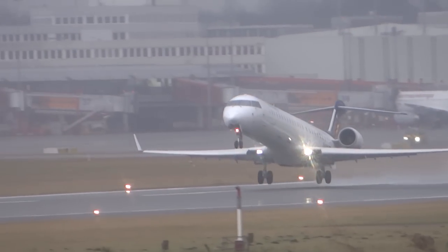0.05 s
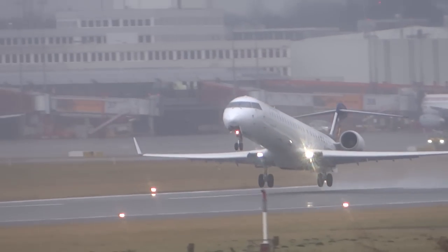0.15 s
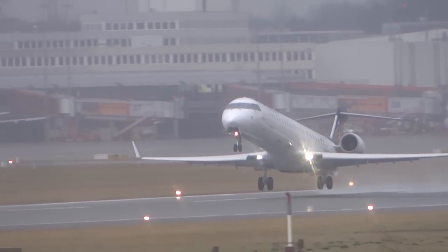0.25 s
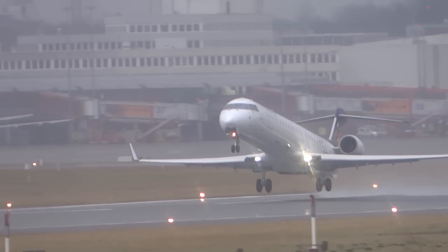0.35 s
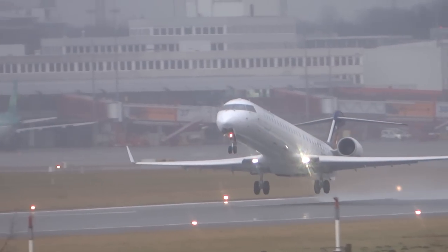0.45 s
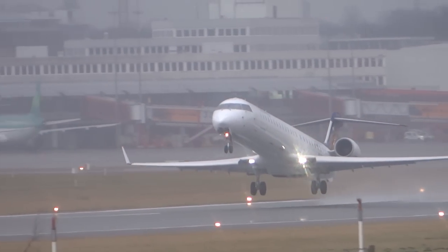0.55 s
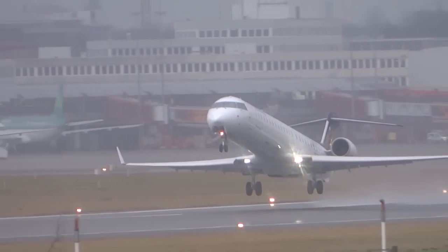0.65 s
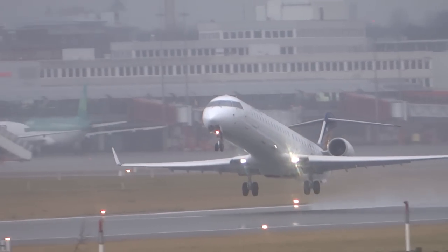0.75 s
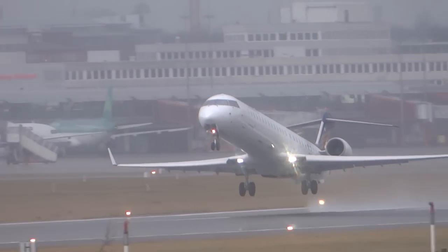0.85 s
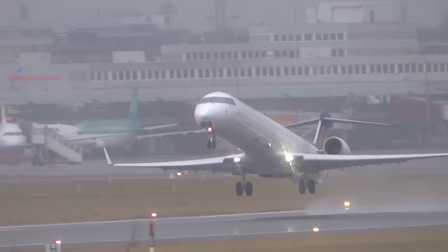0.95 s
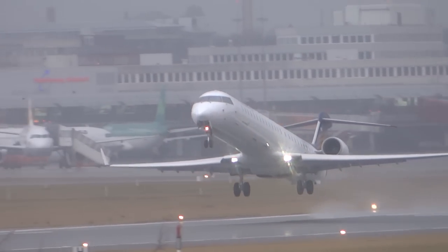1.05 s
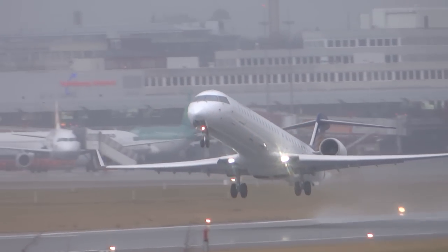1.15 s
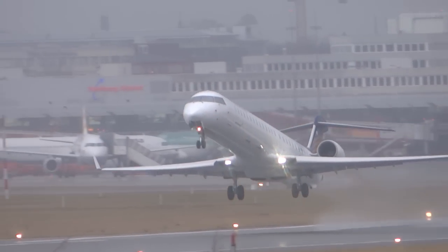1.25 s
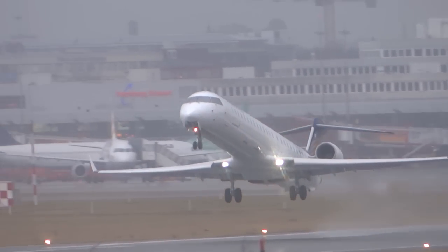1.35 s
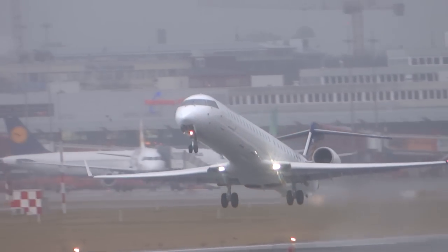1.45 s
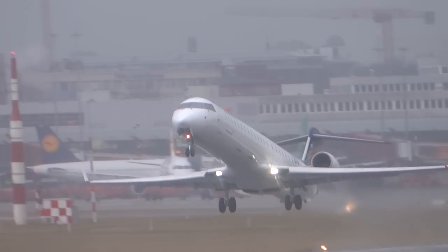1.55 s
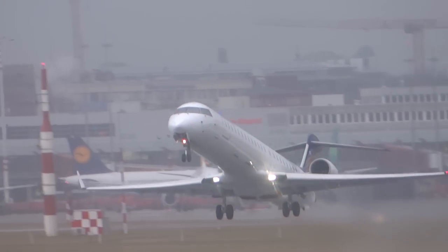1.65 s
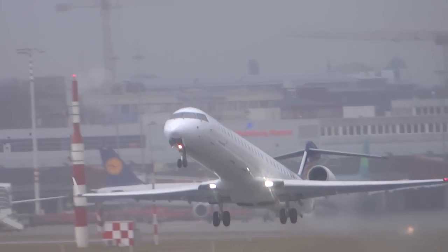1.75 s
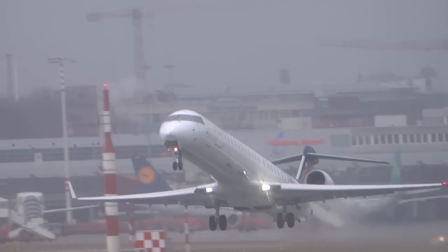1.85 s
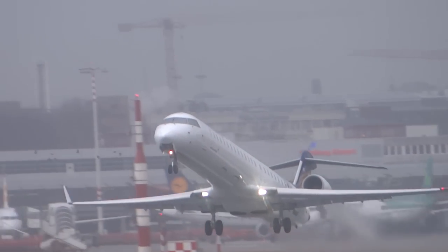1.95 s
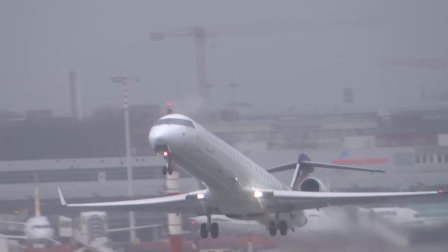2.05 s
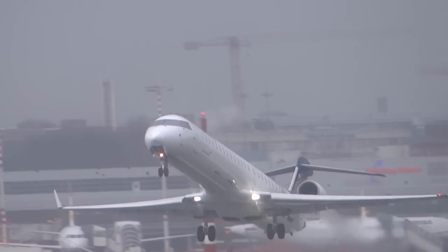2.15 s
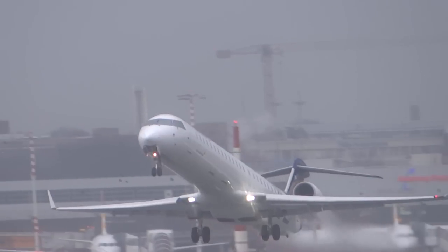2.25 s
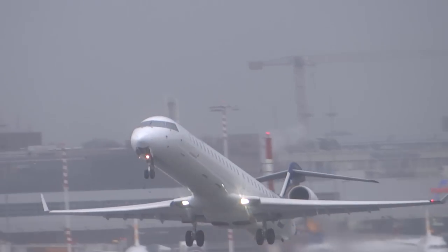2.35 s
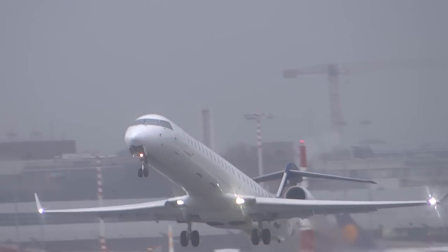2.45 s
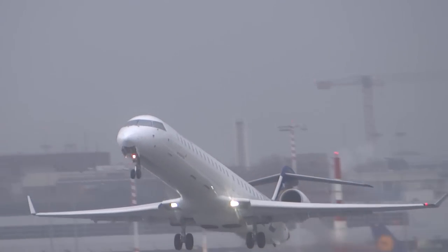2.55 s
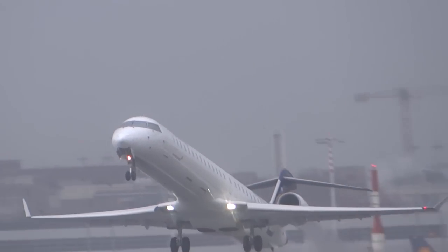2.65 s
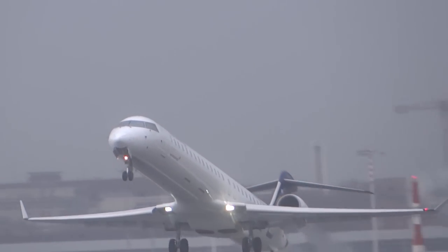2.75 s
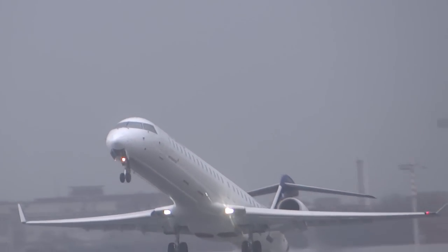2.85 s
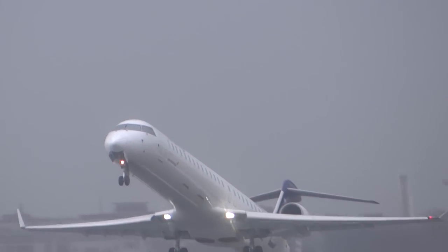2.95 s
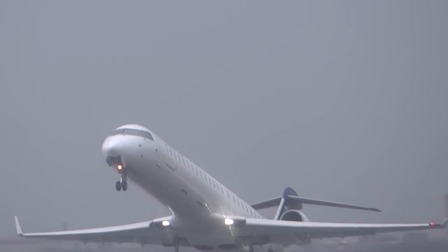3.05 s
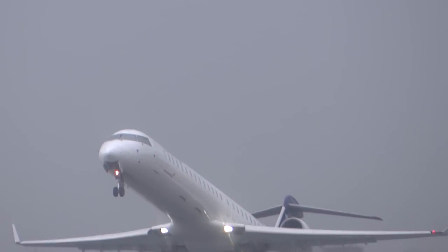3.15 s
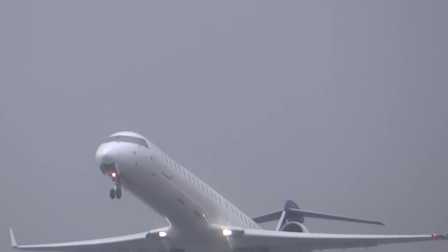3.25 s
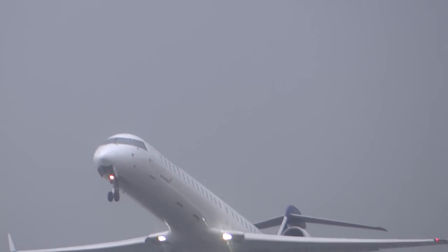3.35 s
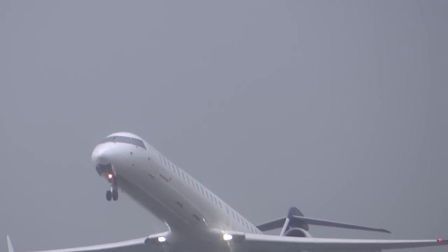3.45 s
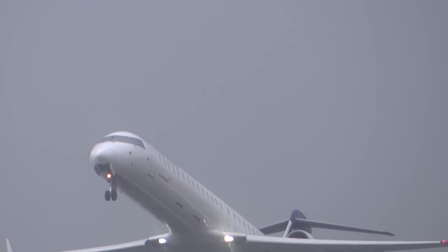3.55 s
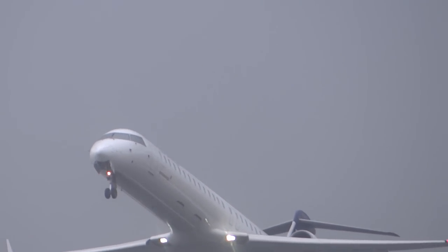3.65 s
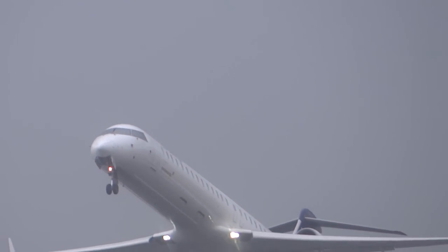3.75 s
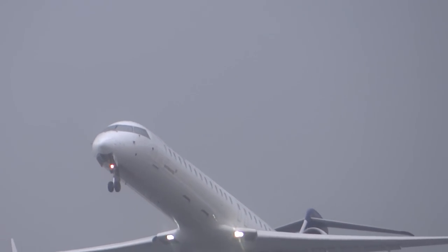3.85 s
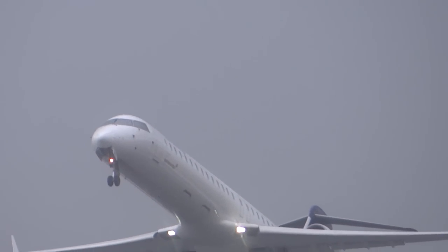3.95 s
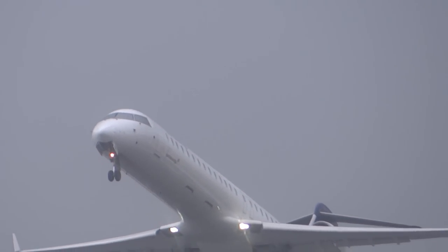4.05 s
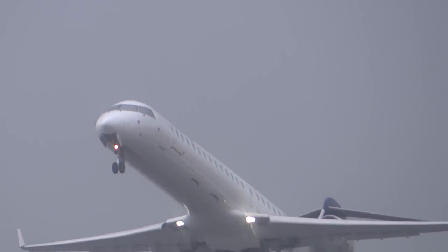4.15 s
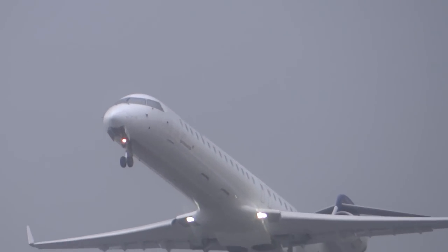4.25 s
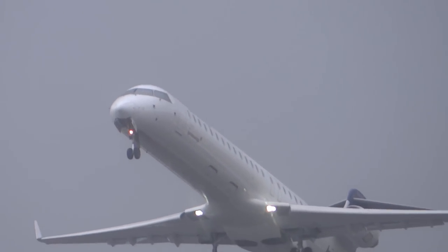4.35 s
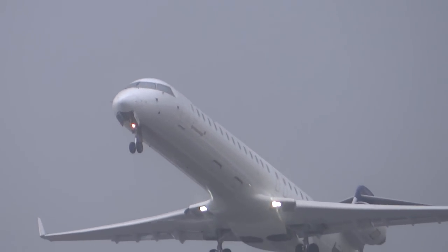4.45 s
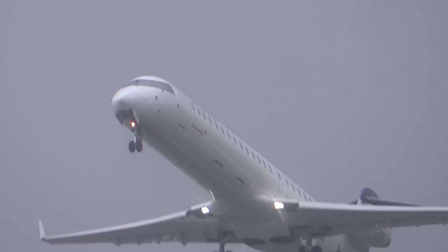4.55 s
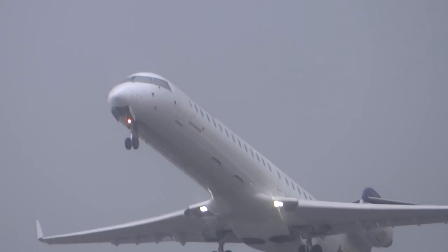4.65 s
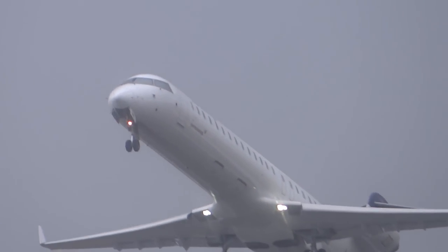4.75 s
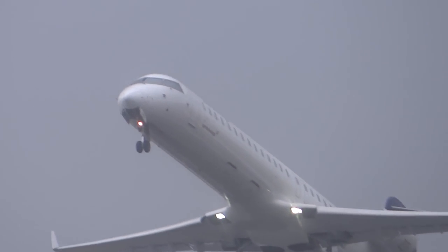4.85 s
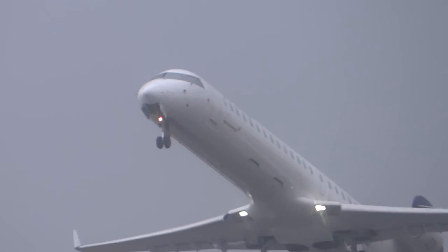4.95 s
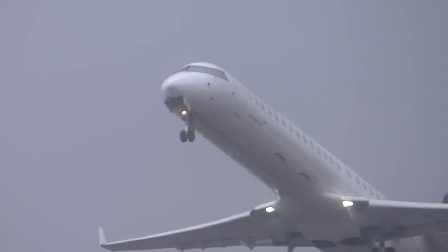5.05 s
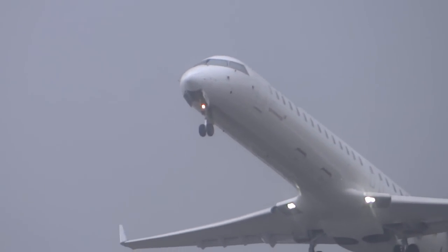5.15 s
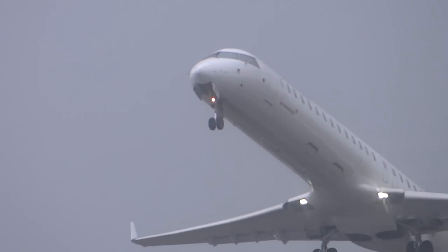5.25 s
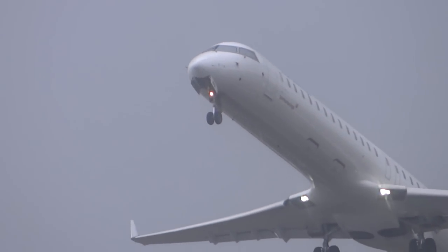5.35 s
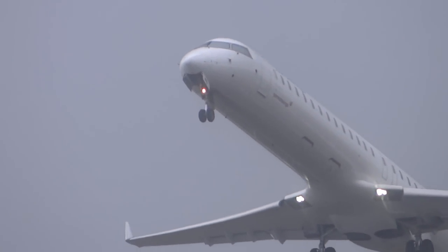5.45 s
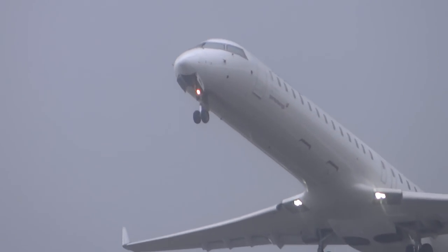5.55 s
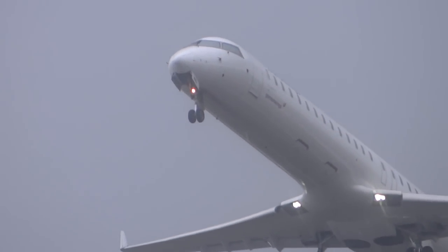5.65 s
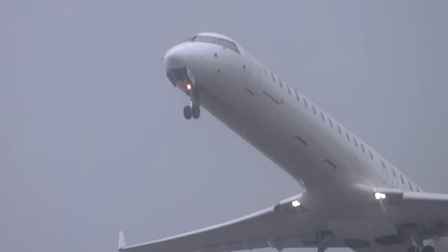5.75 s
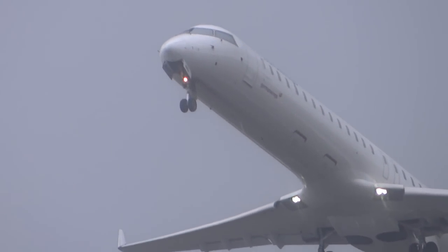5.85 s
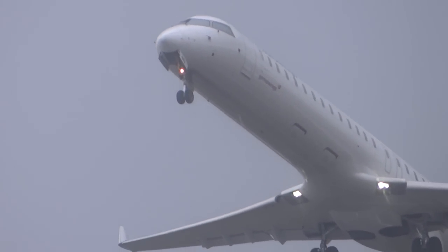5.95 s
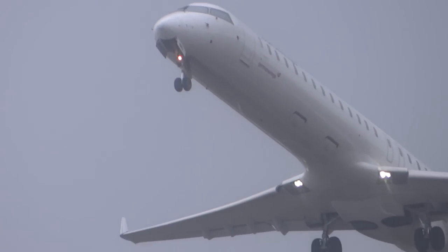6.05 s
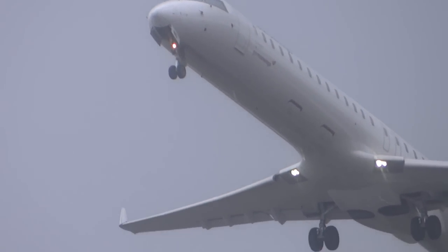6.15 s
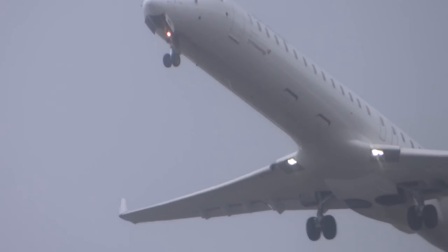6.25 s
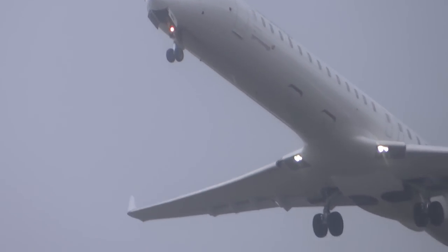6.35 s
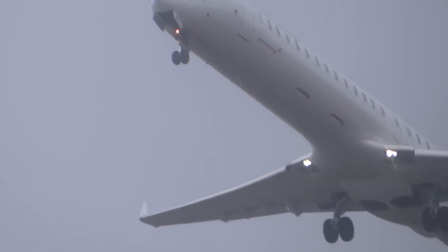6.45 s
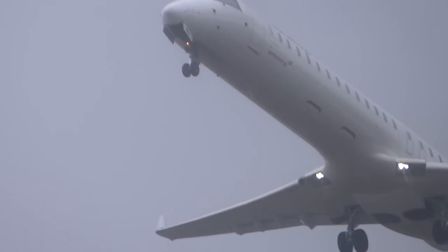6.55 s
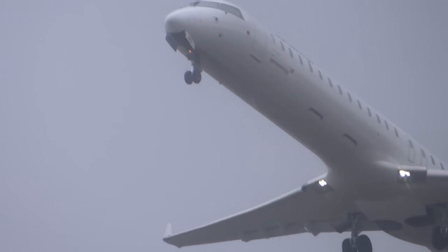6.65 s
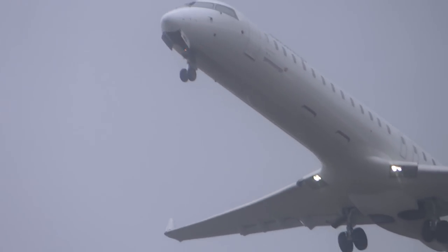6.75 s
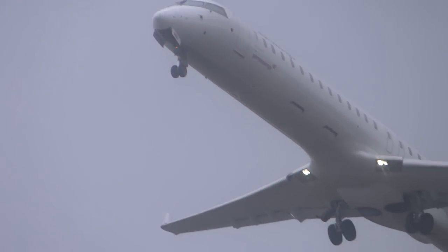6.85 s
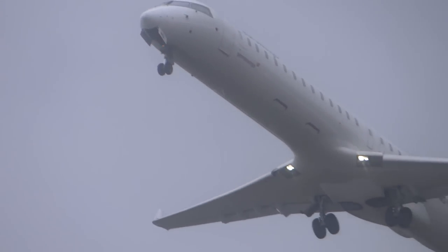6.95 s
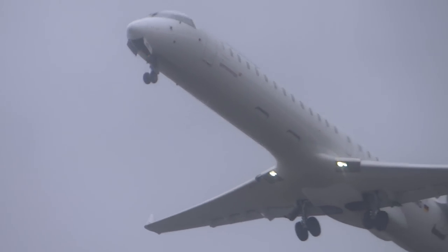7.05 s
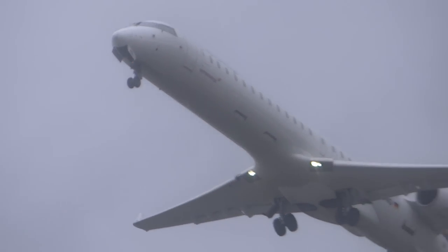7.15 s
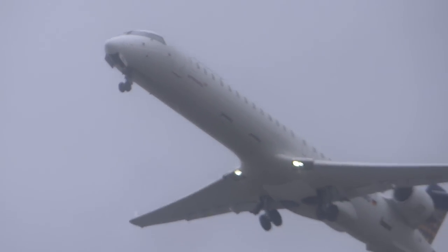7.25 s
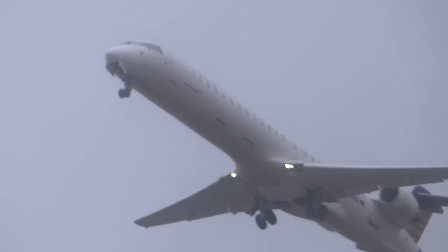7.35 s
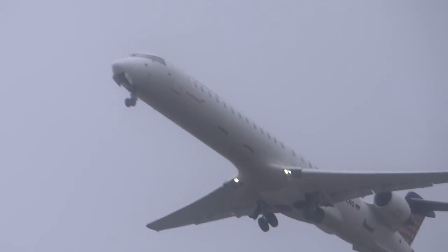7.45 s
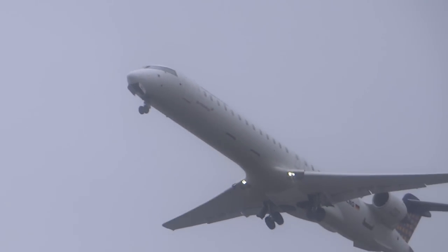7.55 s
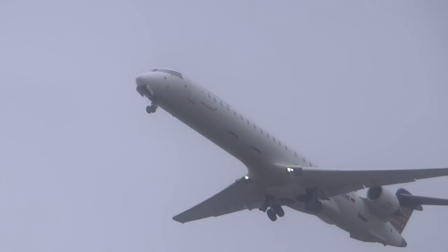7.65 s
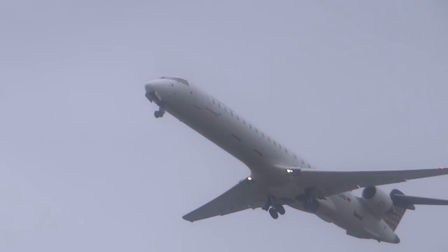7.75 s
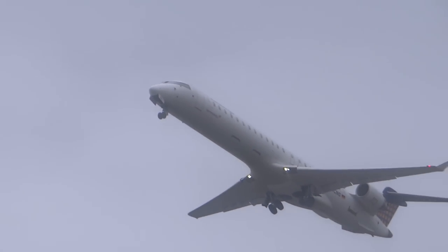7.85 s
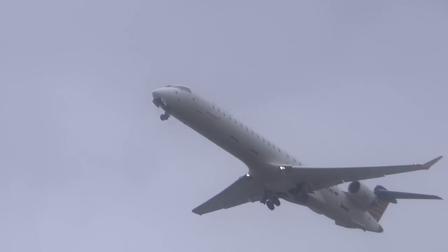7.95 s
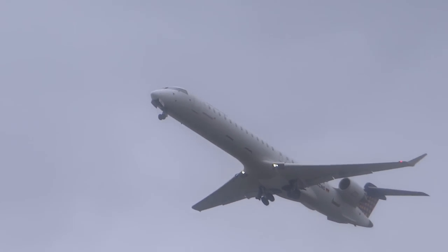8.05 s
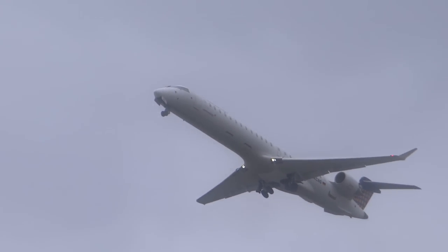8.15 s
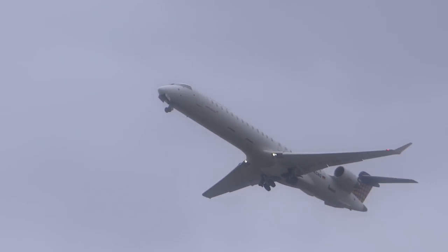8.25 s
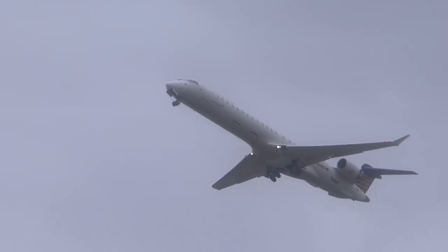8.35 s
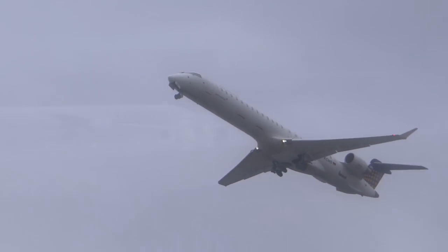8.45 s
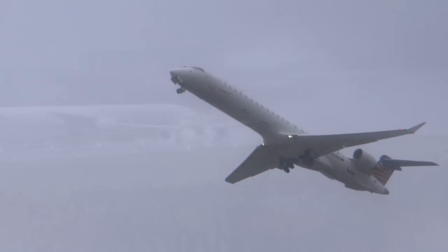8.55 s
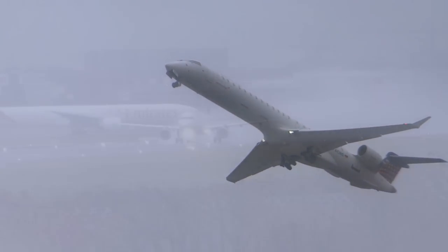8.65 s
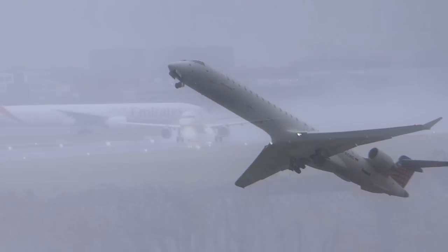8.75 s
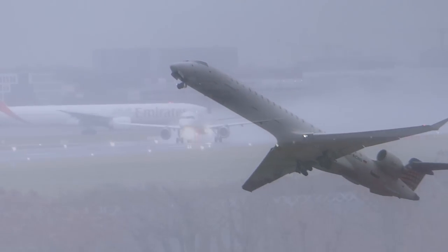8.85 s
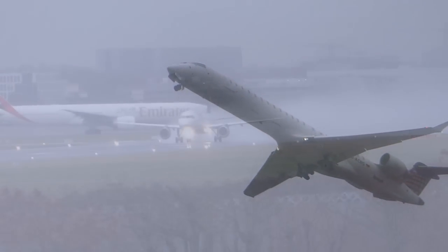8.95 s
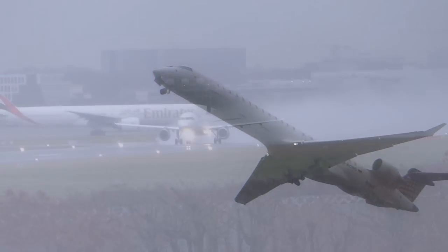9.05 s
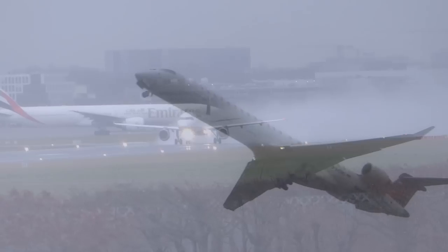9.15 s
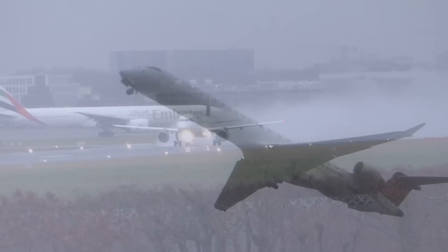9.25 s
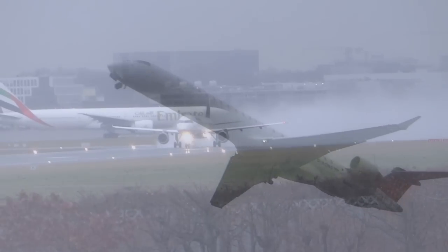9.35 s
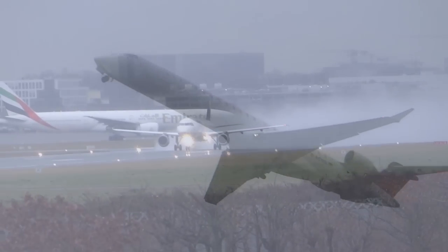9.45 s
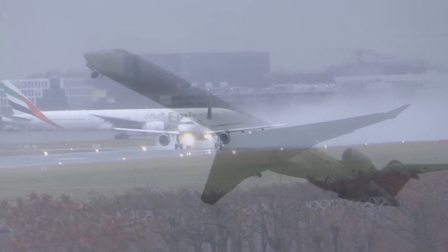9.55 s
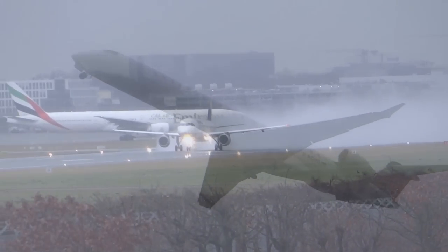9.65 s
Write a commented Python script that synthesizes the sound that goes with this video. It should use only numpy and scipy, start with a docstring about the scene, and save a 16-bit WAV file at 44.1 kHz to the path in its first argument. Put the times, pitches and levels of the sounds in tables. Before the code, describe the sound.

A small bird twitters faintly over distant airport rumble as a climbing jet grows into a loud, whining roar.

```python
"""A twin-engined jet climbs off a wet runway and passes about 130 m from a camera microphone at
the airfield's edge. Its turbulent exhaust roar swells out of the distant airport rumble, surging in
the moving air; fan whine and a low howl sink in pitch with the Doppler shift.
A small songbird whistles and twitters nearby, a little to the right, and another calls far off.
A few raindrops tick on the camera's housing, right at the microphone."""
import sys
import numpy as np
from scipy import signal
from scipy.fft import rfft, irfft, next_fast_len
from scipy.io import wavfile
from scipy.ndimage import uniform_filter1d, map_coordinates

SR = 44100
rng = np.random.default_rng(int(sys.argv[2]) if len(sys.argv) > 2 else 0)


def int16_out(signal):
    """Quantize to a 16-bit WAV file."""
    q = np.round(np.clip(np.atleast_2d(signal).T, -1, 1) * 32767)
    wavfile.write(sys.argv[1], SR, q.astype(np.int16))


N = 428211

# the flight path: moment and distance of closest approach, speed, air loss beyond that distance
ABREAST_S, CLOSEST_M, SPEED_M_PER_S, AIR_LOSS_DB_PER_M = 8.844, 132.6, 75, 0.01
# each engine sound leaves in a beam: on-axis level/dB, axis from nose/deg, width/deg, off-axis drop/dB
RUMBLE_BEAM = (-46.5, 73, 47, 22.5)
ROAR_BEAM = (-35, 90.5, 69, 39.5)
HOWL_BEAM = (-34.5, 80.5, 52, 41)
AIR_BEAM = (-29.5, 74.5, 40.5, 24.5)
FAN_BEAM = (-31.5, 78.5, 49, 30.5)
WHINE_BEAM = (-45, 83, 53.5, 47)
TURBINE_BEAM = (-48.5, 89.5, 41, 26)
# moving air focuses the jet on the microphone: t/s, width/s, roar/dB, howl/dB, rush/dB, whine/dB
SURGES = [(5.24, 0.53, 0, 6, 1, 7), (6.95, 0.41, 5.5, 7, 4.5, 3.5), (7.43, .15, 5, 6, 1, 0),
          (7.551, 0.1, 3.5, 2.5, 4.5, 14.5), (7.758, 0.12, 3, 9, 6.5, 8.5), (8.06, 0.1, 3, 6, -0.4, 6),
          (8.33, 0.066, 0.5, 0, -0.5, 4), (8.798, 0.12, -2, 9, 5, 12), (9.08, 0.093, -2, 8.5, 0.4, -1),
          (9.3, 0.076, 0.5, 4.5, 0, 9)]
# exhaust roar and rush of air, from ahead of the jet and as it passes: f/Hz, relative level/dB
ROAR_AHEAD = [(170, -6), (215, -2), (275, 2), (340, -2), (385, -2), (450, -0.5), (600, -12.5), (780, -9.5),
              (1000, -25), (1500, -49)]
ROAR_BEHIND = [(180, -28), (240, -13), (335, 3.5), (365, -5.5), (400, 4.5), (550, -16.5), (780, -7.5),
               (1000, -27), (1500, -50)]
AIR_AHEAD = [(600, -5.5), (780, -10.5), (950, -1.5), (1100, -0.5), (1300, -.5), (1550, -4.5), (1800, -11.5),
             (2400, -31)]
AIR_ABREAST = [(540, 1.5), (620, -3), (780, -12.5), (950, -5), (1300, -0.5), (1550, -2), (1800, -11.5),
               (2400, -33)]
ROAR_TURN_DEG, AIR_TURN_DEG = (59, 104), (56.4, 67.7)  # angles over which each takes its later colour
# spectra of the jet's other noise bands: f/Hz, relative level/dB
RUMBLE_COLOUR = [(30, -25), (50, -26), (70, -5.5), (95, -2.5), (125, -1), (170, 1.5), (205, 0), (260, -1)]
FAN_COLOUR = [(1300, -14), (1750, 0), (2250, 1), (2800, -2), (3200, -8), (3600, -7), (3850, -5),
              (4100, -14.5), (4600, -18.5), (5500, -34.5)]
TURBINE_COLOUR = [(3500, 1), (4400, -1), (5000, -0.5), (5850, -0.5), (6300, -6.5), (7200, -12), (8200, -29),
                  (11000, -46)]
HOWL_COLOUR = [(420, -25), (475, 6), (510, -5.5), (580, -17.5)]
WHINE_COLOUR = [(3300, -7.5), (3600, -9), (3850, 1), (4000, -13), (4300, -15.5)]
HISS_COLOUR = [(5000, -24), (7300, -5), (8300, 3.5), (9100, -11), (9900, -6), (11000, -15.5), (12500, -7),
               (14000, -16.5), (15800, -23)]
# fan blade tone at the microphone, lowered by the passing motion: t/s, f/Hz
BLADE_GLIDE = [(0, 3995), (5, 3985), (6, 3975), (7, 3945), (7.6, 3918), (8, 3890), (8.4, 3866),
               (8.85, 3834), (9.25, 3775), (9.71, 3718)]
# tones of the fan shaft: shaft order, relative level/dB
FAN_ORDERS = [(7, -8), (11, -6), (14, -3.5), (28, 1), (30, -11), (36, -21.5), (42, -26.5)]
# the jet leans to the right of the microphone: f/Hz, left minus right/dB
JET_BALANCE = [(125, -.1), (250, -.7), (500, -1.3), (2000, -2), (4000, -1.4), (12000, -.3)]
# rise and fall of the high hiss: t/s, level/dB
HISS_LEVEL = [(5.4, -85), (5.6, -74), (5.97, -78), (6.03, -68.5), (8, -65.5), (8.27, -56), (8.45, -67),
              (8.66, -71), (9.2, -83)]
# soft swishes: t/s, width/s, level/dB
SWISHES = [(2.17, 0.1, -74.5), (4.76, 0.19, -74), (5.13, 0.082, -69), (5.72, 0.22, -67),
           (7.55, 0.23, -56.5)]

# the near songbird's phrases, a high whistle and then a low one: t/s, low whistle's level/dB
PHRASES = [(-.245, -65), (2.465, -56.5), (4.857, -54.5), (7.53, -60.5)]
HIGH_WHISTLE_HZ, LOW_WHISTLE_HZ = [7100, 7380, 7340, 7000], [5350, 5170, 5060, 5020]
HIGH_WHISTLE_S, LOW_WHISTLE_S, LOW_AFTER_S, HIGH_WHISTLE_DB = 0.088, 0.15, 0.19, -6.5
# its V-shaped chips: t/s, level/dB
CHIPS = [(4.235, -75), (4.312, -76), (4.402, -74)]
CHIP_S, CHIP_HZ = 0.052, [5900, 4800, 5500, 5750]
# its slides: t/s, length/s, start f/Hz, end f/Hz, level/dB
SLIDES = [(3.246, 0.057, 5750, 6660, -75), (3.68, .05, 5400, 4880, -82), (3.82, .05, 5600, 4700, -82),
          (4.112, .06, 5850, 6650, -76), (5.28, .066, 5800, 5050, -71), (5.855, 0.28, 8500, 7970, -71)]
# its buzzes: t/s, length/s, f/Hz, level/dB
BUZZES = [(.07, 0.086, 7970, -80), (2.95, 0.059, 5000, -65), (3.033, 0.059, 5260, -69),
          (3.13, 0.052, 5330, -71), (3.1, 0.11, 7960, -72), (3.767, .08, 7800, -80),
          (5.35, 0.058, 5130, -66), (5.442, 0.052, 5250, -69), (8.288, 0.027, 7600, -49),
          (8.317, 0.038, 7900, -47)]
# its twitters: t/s, length/s, upper f/Hz, upper level/dB, lower f/Hz, lower level/dB
TWITTERS = [(0.278, 0.33, 9000, -79, 6340, -79), (2.73, 0.39, 8940, -77.5, 6300, -72),
            (5.481, 0.49, 10170, -65, 6420, -68.5), (8.002, 0.4, 12050, -70.5, 9300, -63),
            (8.4, 0.27, 9660, -74, 8600, -76)]
# the far bird's two notes: delay/s, f/Hz, level/dB
FAR_NOTES = [(0, 3500, -77.5), (.108, 4490, -83)]

# raindrops on the camera: t/s, relative splat level/dB, treble cutoff/Hz, thump level/dB
DROPS = [(1.14, -62, 15000, -100), (1.347, -68, 11000, -100), (2.266, -42, 4500, -95),
         (6.1255, -23.5, 13000, -75), (8.13, -36, 15100, -80), (8.283, -44, 15000, -80),
         (8.365, -32.5, 15000, -48), (8.505, -40.5, 11800, -79)]
# spectrum of a splat on the housing: f/Hz, gain/dB
DROP_COLOUR = [(300, -15), (1500, -6), (2800, -4), (4400, 0), (6000, -7), (8200, -4), (11000, -9),
               (15800, -14)]
# engines far across the airfield: f/Hz, relative level/dB
AIRPORT_COLOUR = [(30, -29), (60, -13), (120, -4.5), (190, -14), (270, -6), (380, -4), (480, -0.5),
                  (700, -2.5), (1100, -1.5), (1500, -3.5), (2200, -13), (3500, -20), (4500, -26),
                  (8000, -31), (15800, -37.5)]


def jet_noise(fan_surge=1.1, turbine_surge=0.58):
    """Turbulent exhaust and fan flow; the turbine comes in as the engines draw abreast."""
    roar_db, _, rush_db, whine_db = surges()
    flutter = wobble(19)  # eddies on the path make the higher bands twinkle together
    rumble = amp(heard(RUMBLE_BEAM)) * rush(RUMBLE_COLOUR, patchy_db=2, width=.06)
    roar = turning(ROAR_TURN_DEG, rush(ROAR_AHEAD, patchy_db=0.4, width=0.027),
                   rush(ROAR_BEHIND, patchy_db=-2, width=0.063))
    roar *= amp(heard(ROAR_BEAM) + roar_db)
    air = turning(AIR_TURN_DEG, rush(AIR_AHEAD, patchy_db=1.63, width=0.098),
                  rush(AIR_ABREAST, patchy_db=1.07, width=0.098))
    air *= amp(heard(AIR_BEAM) + rush_db + 0.6 * flutter)
    fan = rush(FAN_COLOUR, patchy_db=1.4, width=0.098)
    fan *= amp(heard(FAN_BEAM) + fan_surge * rush_db + 0.27 * flutter)
    turbine = rush(TURBINE_COLOUR, patchy_db=2, width=0.17)
    turbine *= amp(heard(TURBINE_BEAM) + turbine_surge * whine_db + 2.5 * flutter)
    return rumble + roar + air + fan + turbine


def jet_tones(blades=28):
    """Fan orders and a low howl share one Doppler glide; turbulence blurs them and adds noise skirts."""
    blade_hz, = curves(BLADE_GLIDE)
    shaft_hz, howl_hz = blade_hz / blades, blade_hz / 8
    _, howl_db, _, whine_db = surges()
    whine = sum(amp(db + 1.6 * wobble(24)) * tone(order * shaft_hz * (1 + 0.00293 * wobble(70)))
                for order, db in FAN_ORDERS)
    howl = unit(amp(3 * wobble(28)) * tone(howl_hz * (1 + .016 * wobble(60))))
    whine_skirt = amp(-2) * rush(WHINE_COLOUR, patchy_db=2, width=.12)
    gusts = amp(2.1 * wobble(24))
    howl_skirt = rush(HOWL_COLOUR, patchy_db=4, width=0.068)
    whine = amp(heard(WHINE_BEAM) + whine_db) * gusts * (amp(-1) * whine + whine_skirt)
    howl = amp(heard(HOWL_BEAM) + howl_db) * (.87 * howl + .5 * howl_skirt)
    return whine + howl


def flight():
    """Distance to the jet (m) and the angle between its nose and the microphone (deg)."""
    to_go = SPEED_M_PER_S * (ABREAST_S - np.arange(N) / SR)
    return np.hypot(to_go, CLOSEST_M), np.degrees(np.arctan2(CLOSEST_M, to_go))


def heard(beam):
    """Level in dB of one engine sound as its beam sweeps over the microphone."""
    db, axis_deg, width_deg, drop_db = beam
    distance, angle = flight()
    off_axis = 1 - np.exp(-((angle - axis_deg) / width_deg) ** 2)
    spreading_db = 20 * np.log10(distance / CLOSEST_M)
    return db - drop_db * off_axis - spreading_db - AIR_LOSS_DB_PER_M * (distance - CLOSEST_M)


def turning(span_deg, early, late):
    """One noise gives way to another as the passing jet shows the microphone its side."""
    _, angle = flight()
    share = np.clip((angle - span_deg[0]) / (span_deg[1] - span_deg[0]), 0, 1)
    return np.sqrt(1 - share) * early + np.sqrt(share) * late


def surges():
    """Extra dB for the roar, howl, rush and whine as moving air focuses them."""
    return sum(np.outer(gains_db, swell(s, width)) for s, width, *gains_db in SURGES)


def hiss():
    """A smooth high hiss that rises while the jet is near, and a few soft swishes."""
    hiss_db, = curves(HISS_LEVEL)
    high = amp(hiss_db + .4 * wobble(19)) * rush(HISS_COLOUR, patchy_db=.5, width=.04)
    swishing = sum(amp(db) * swell(s, width) for s, width, db in SWISHES)
    swish = rush([(4000, -2), (6500, -5), (8500, 0), (11500, -14.5)], patchy_db=4.5, width=0.064)
    return high + swishing * swish


def songbird():
    """A small bird near the microphone; in its twitters both sides of the syrinx sing at once."""
    song = np.zeros(N)
    for s, db in PHRASES:
        add(song, s, amp(db + HIGH_WHISTLE_DB) * note(HIGH_WHISTLE_S, HIGH_WHISTLE_HZ))
        add(song, s + LOW_AFTER_S, amp(db) * note(LOW_WHISTLE_S, LOW_WHISTLE_HZ))
    for s, db in CHIPS:
        add(song, s, amp(db) * note(CHIP_S, CHIP_HZ))
    for s, length, start_hz, end_hz, db in SLIDES:
        add(song, s, amp(db) * note(length, [start_hz, end_hz]))
    for s, length, hz, db in BUZZES:
        add(song, s, amp(db) * note(length, [hz] * 3, rasp_hz=480))
    for s, length, upper_hz, upper_db, lower_hz, lower_db in TWITTERS:
        middle_hz = (upper_hz + lower_hz) / 2
        add(song, s, amp(upper_db) * twitter(length, upper_hz, sag=.14))
        add(song, s, amp(upper_db - 4) * twitter(length, middle_hz, sag=.06, swoop=.09, rasp_hz=450))
        add(song, s, amp(lower_db) * twitter(length, lower_hz, sag=.06))
    return outdoors(song, t60=0.78, wet_db=-13)


def twitter(length, top_hz, sag, swoop=.04, rasp_hz=200, per_second=62, scatter_db=3):
    """An arch of swooping syllables, pure or scratchy; its ends lie under its top by the share sag."""
    run = np.zeros(SR)
    count = round(length * per_second)
    for k, (late, span, rasp, size, *bend) in enumerate(rng.standard_normal((count, 7))):
        arch = np.sin(np.pi * (k + .5) / count)
        contour_hz = top_hz * (1 - sag * (1 - arch)) * (1 + swoop * np.array(bend))
        syllable = note(.03 * np.exp(.3 * span), contour_hz, rasp_hz=rasp_hz * max(rasp, 0))
        add(run, (k + 0.4 * late) / per_second, arch ** 0.14 * amp(scatter_db * size) * syllable)
    return unit(run[:int((length + .05) * SR)])


def note(length, contour_hz, rasp_hz=0):
    """One bird note gliding through its pitches with a slight waver; fast pitch noise makes it rasp."""
    u = np.linspace(0, 1, int(length * SR))
    pitch = np.interp(u, np.linspace(0, 1, len(contour_hz)), contour_hz)
    envelope = unit(np.abs(np.sin(np.pi * u)) ** .7)
    return envelope * tone(pitch + 30 * wobble(90, len(u)) + rasp_hz * wobble(2500, len(u)))


def raindrops(t60=0.013, rise_s=0.00022, thump_hz=36, thump_t60=.15):
    """Each drop splats briefly right by the microphone; a heavy one also shakes the housing."""
    splats, thumps = np.zeros(N), np.zeros(N)
    t = np.arange(SR // 5) / SR
    for s, db, bright_hz, thump_db in DROPS:
        spray = signal.lfilter(*signal.butter(3, bright_hz, fs=SR), rng.standard_normal(len(t)))
        add(splats, s, amp(db + 5.5 - 60 * t / t60) * (1 - np.exp(-t / rise_s)) * spray)
        add(thumps, s, amp(thump_db - 60 * t / thump_t60) * np.sin(2 * np.pi * thump_hz * t))
    return coloured(splats, DROP_COLOUR) + thumps


def far_bird(count=6, start_s=1.195, period_s=.281, note_s=0.081, sag_hz_per_s=62):
    """Far off, a bird see-saws between a low and a high note, sinking a little."""
    calls = np.zeros(N)
    for since in period_s * np.arange(count):
        for after, hz, db in FAR_NOTES:
            pitch = hz - sag_hz_per_s * since
            add(calls, start_s + since + after, amp(db) * note(note_s, [pitch + 40, pitch - 30]))
    return outdoors(calls, t60=.7, wet_db=-2)


def airport():
    """Steady engines across the airfield, a low hum and a far drone that soon fades."""
    engines = amp(-60 + 0.21 * wobble(5.5)) * rush(AIRPORT_COLOUR, patchy_db=0, width=0.25)
    hum = amp(-77) * rush([(45, -25), (60, 0), (80, -26)], patchy_db=1, width=.02)
    drone = amp(-72) * swell(.3, .35) * tone(545 + 8 * wobble(50))
    return engines + hum + drone


def camera_whine():
    """A faint, steady high whine from the camera itself."""
    return amp(-95) * tone(9750 + 70 * wobble(300))


def outdoors(x, t60, wet_db):
    """The direct sound plus a thin scatter from trees and ground."""
    t = np.arange(SR // 2) / SR
    tail = rng.standard_normal((2, len(t))) * amp(-60 * t / t60)
    return x + amp(wet_db) * signal.fftconvolve(x[None], tail / np.linalg.norm(tail[0]), axes=1)[:, :N]


def rush(spectrum, patchy_db, width):
    """Noise of rms near 1, mono in the bass, wider above; moving air gives it patches of random gain."""
    bins = signal.stft(rng.standard_normal((2, N)), nperseg=512)[2]
    patches = uniform_filter1d(rng.standard_normal(bins.shape[1:]), size=5, axis=0)
    patches = uniform_filter1d(patches, size=16, axis=1)
    pair = signal.istft(bins * amp(patchy_db * unit(patches)), nperseg=512)[1][:, :N]
    mid, side = unit(coloured(pair, spectrum))
    side = filtered(side, lambda hz: width * np.minimum(hz / 500, 1))
    return np.array([mid + side, mid - side])


def coloured(x, spectrum):
    """x through a spectrum that falls steeply beyond its ends."""
    low, high = spectrum[0][0], spectrum[-1][0]
    skirt = lambda hz: np.minimum(1, np.minimum(hz / low, high / (hz + 1))) ** 6
    return filtered(x, lambda hz: amp(along(spectrum, hz)) * skirt(hz))


def filtered(x, response):
    """x times a response of frequency."""
    size = next_fast_len(N + SR // 2)
    return irfft(rfft(x, size) * response(np.fft.rfftfreq(size, 1 / SR)), size)[..., :N]


def along(points, hz):
    """Interpolate (f/Hz, value) points on a log axis."""
    f, values = np.transpose(points)
    return np.interp(np.log(hz + 1), np.log(f + 1), values)


def curves(rows):
    """One value per sample for each column after the time."""
    s, *columns = np.transpose(rows)
    return [np.interp(np.arange(N) / SR, s, column) for column in columns]


def wobble(rate, size=N):
    """A smooth random curve, rate knots a second."""
    knots = rng.standard_normal(int(size * rate / SR) + 4)
    return map_coordinates(knots, [np.arange(size) * rate / SR])


def swell(s, width):
    """A smooth bump of height 1 around time s."""
    return np.exp(-((np.arange(N) / SR - s) / width) ** 2)


def tone(hz):
    """A sine of rms 1 that follows a pitch curve."""
    return np.sqrt(2) * np.sin(2 * np.pi * np.cumsum(hz) / SR)


def add(track, s, sound):
    """Mix a sound into the track at time s."""
    start = round(s * SR)
    part = sound[max(0, -start):N - start]
    track[max(0, start):][:len(part)] += part


def amp(db):
    """Decibels to gain."""
    return 10 ** (np.asarray(db) / 20)


def unit(x):
    """Scale to rms 1."""
    return x / np.sqrt(np.mean(x ** 2) + 1e-20)


def scene():
    """From the airfield's edge: jet and songbird a little to the right, the airport almost dead ahead."""
    pan = lambda left_db: amp(np.outer([.5, -.5], left_db))
    jet = filtered(jet_noise() + jet_tones(), lambda hz: pan(along(JET_BALANCE, hz)))
    background = pan(left_db=.4) * (airport() + camera_whine())
    return jet + background + hiss() + pan(left_db=-1) * songbird() + far_bird() + raindrops()


def record(dry, top_hz=15750):
    """The camera keeps nothing above its band limit."""
    return filtered(dry, lambda hz: hz < top_hz)


dry = scene()
out = record(dry)
int16_out(out)
```